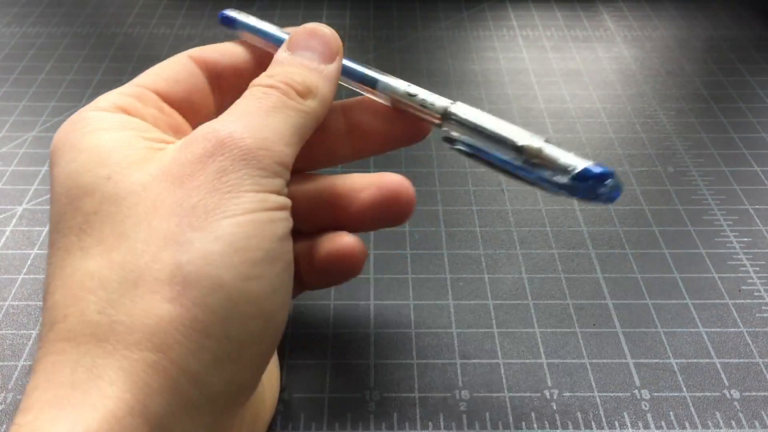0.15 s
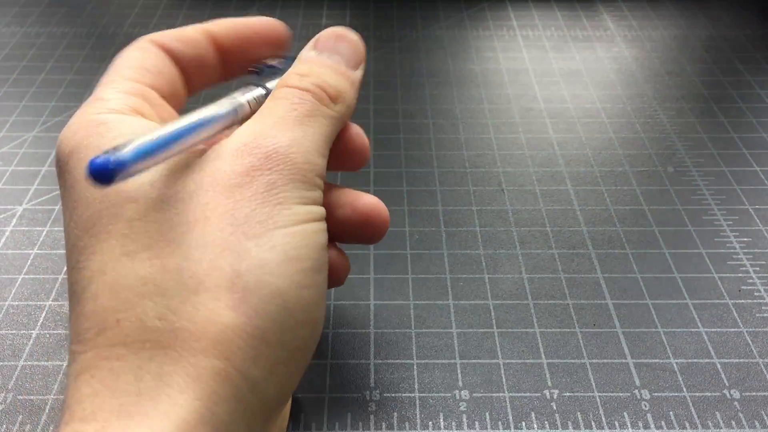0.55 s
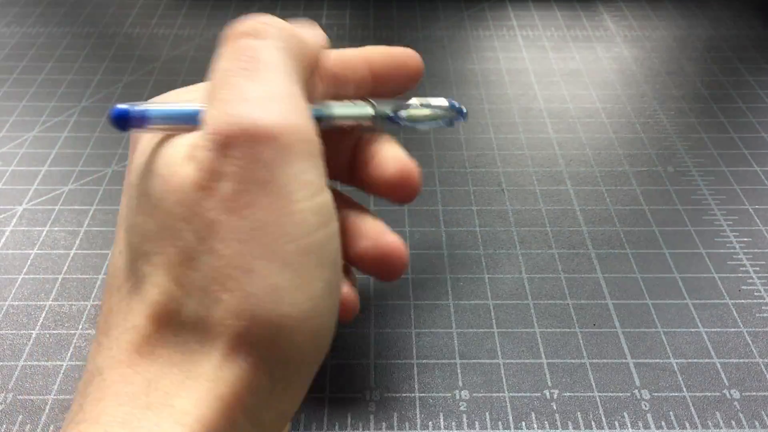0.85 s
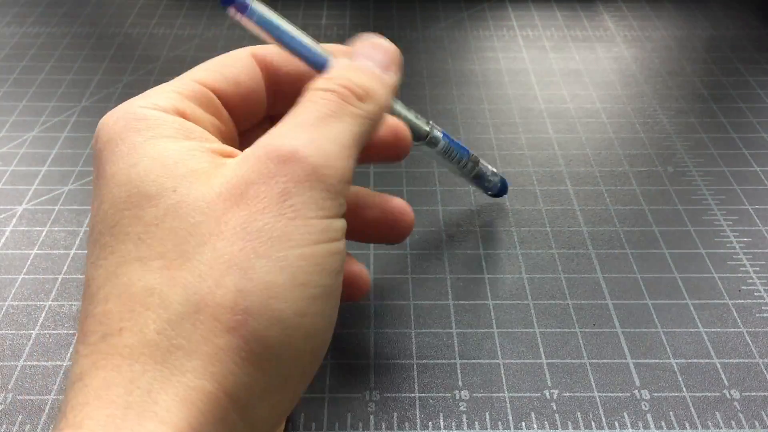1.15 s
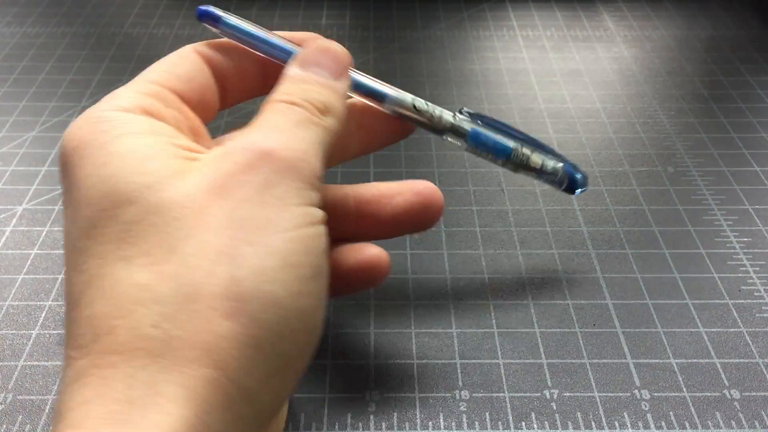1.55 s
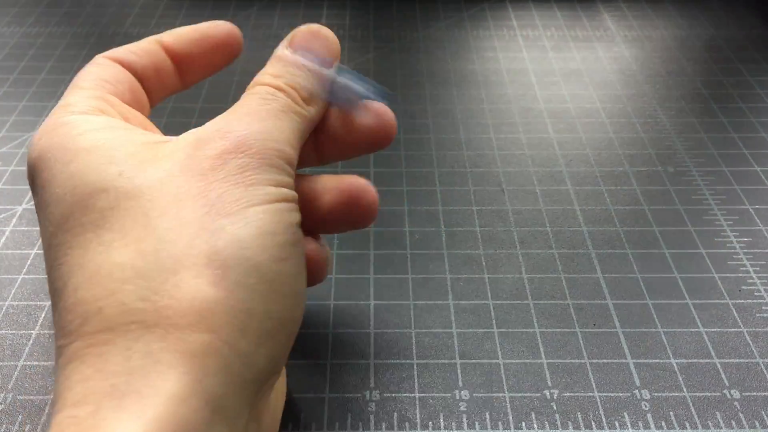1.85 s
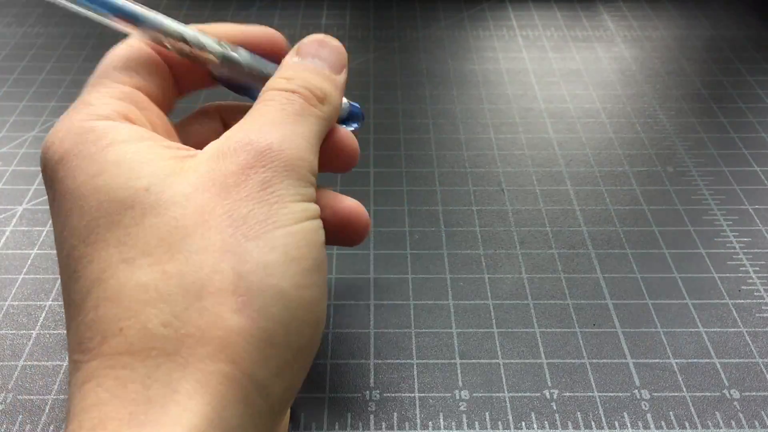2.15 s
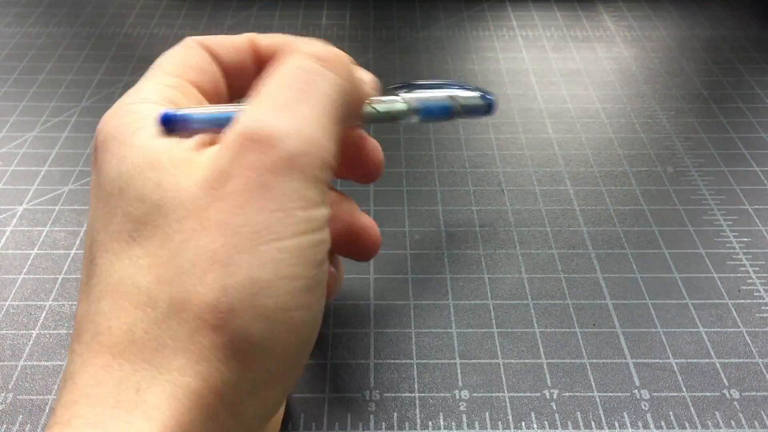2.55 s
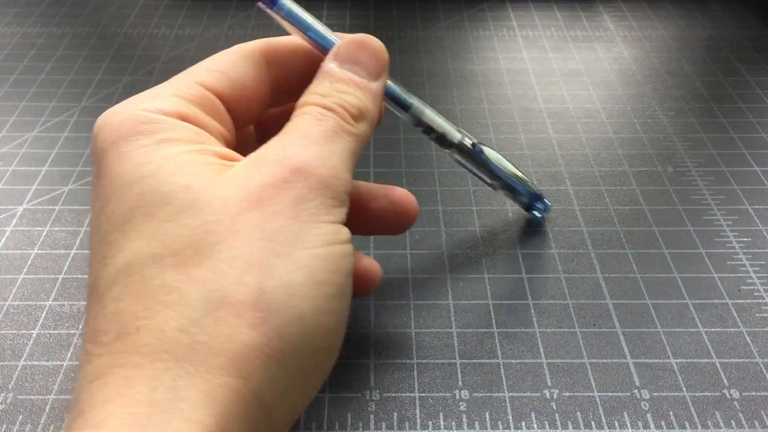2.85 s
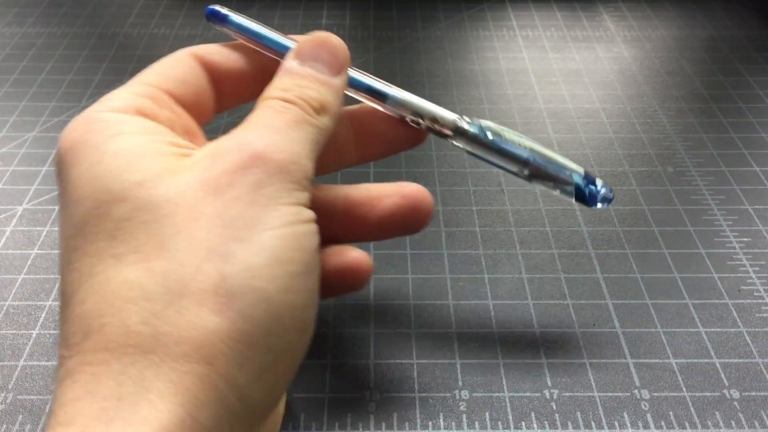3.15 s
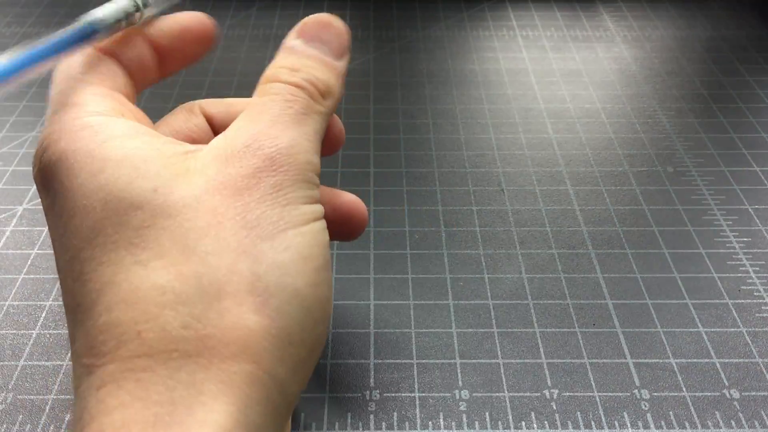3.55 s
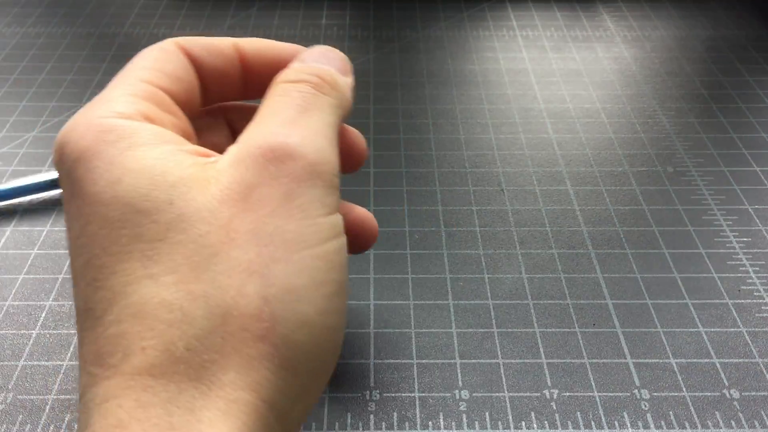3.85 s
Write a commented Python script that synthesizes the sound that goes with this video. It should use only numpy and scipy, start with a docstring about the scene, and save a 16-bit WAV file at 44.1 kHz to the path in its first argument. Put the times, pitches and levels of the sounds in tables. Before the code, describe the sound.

A plastic pen spun in one hand ticks, taps a mat twice, then clacks down loudly

```python
"""First comes a low room rumble with hum and faint hiss, shaped from noise around a sine; a drone swells in it.
Just above a cutting mat in a small quiet room, close to the microphone, one hand spins a plastic pen.
Skin hisses, the hand rustles and fingers thud: stick-slip grains in soft bands, and short sine pulses.
The cap ticks; twice the tip taps the mat and drags a little; at last the pen slips, clacks down and bounces.
Each contact is a sharp push with a chatter of loose parts, setting decaying modes ringing in the room."""
import sys
import numpy as np
from scipy import signal
from scipy.fft import rfft, irfft
from scipy.io import wavfile
from scipy.ndimage import uniform_filter1d

SR = 44100
rng = np.random.default_rng(int(sys.argv[2]) if len(sys.argv) > 2 else 0)


def int16_out(signal):
    """Quantize to a 16-bit WAV file."""
    q = np.round(np.clip(np.atleast_2d(signal).T, -1, 1) * 32767)
    wavfile.write(sys.argv[1], SR, q.astype(np.int16))


N = 176400  # 4 s
TOP_HZ = 16000  # upper limit of the recorder, also of skin hiss and contact shapes


def undb(db):
    """Decibels to gain."""
    return 10 ** (np.asarray(db) / 20)


def unit(x):
    """Scale to rms 1."""
    return x / np.sqrt(np.mean(x ** 2))


def conv(x, h):
    """Pass x through the response h, keeping the length of x."""
    return signal.fftconvolve(x, h)[:len(x)]


def colour(x, points, size=2048):
    """Minimum-phase filter through (f/Hz, level/dB) points, so nothing sounds before its cause."""
    hz, db = np.array(points, float).T
    f = np.maximum(np.fft.rfftfreq(size, 1 / SR), 1)
    gain_db = np.interp(np.log(f), np.log(np.sort(hz)), db)
    # Folding the cepstrum onto positive times makes the response causal
    cepstrum = irfft(np.log(undb(gain_db)))
    cepstrum[1:size // 2] *= 2
    cepstrum[size // 2 + 1:] = 0
    return conv(x, irfft(np.exp(rfft(cepstrum))))


def walk(rate):
    """Slow random drift of rms 1, from random steps at this rate (Hz) smoothed twice."""
    k = int(SR / rate)
    steps = np.repeat(rng.standard_normal(N // k + 1), k)
    smooth = uniform_filter1d(uniform_filter1d(steps, k), k)
    return unit(smooth[:N])


def swell(t, middle, half):
    """Bell-shaped rise and fall; half is its standard deviation in seconds."""
    return np.exp(-.5 * ((t - middle) / half) ** 2)


def grains(per_s, spread_db):
    """Dense stick-slip clicks of uneven size, at rms 1."""
    happens = rng.random(N) < per_s / SR
    size = rng.standard_normal(N) * undb(spread_db * rng.standard_normal(N))
    return unit(happens * size)


# Spectrum of the room air at the microphone: f/Hz, relative density/dB per Hz
AIR_SPECTRUM = [(15, -42), (25, -27.5), (35, -18.5), (50, -1), (70, 0), (100, -7), (125, -2.5), (150, -9),
                (187, -5.5), (240, -15.5), (330, -18), (500, -26), (870, -25.5), (1260, -31), (2080, -34),
                (4940, -41.5), (6300, -41.5), (7900, -45.5), (9000, -42), (10500, -48.5), (12000, -44.5),
                (16000, -51.5)]


def air(t):
    """Room rumble and hiss, coloured noise drifting slowly in level, with a steady mains hum."""
    level_db = -58 + 0.82 * walk(2.91)  # drift in dB rms
    noise = unit(colour(rng.standard_normal(N), AIR_SPECTRUM, size=16384))
    hum = unit(np.sin(2 * np.pi * 61 * t))
    return noise * undb(level_db) + undb(-69.5) * hum


# Level of the low drone in the room: t/s, level/dB
DRONE_LEVEL = [(0, -73), (.6, -66.5), (.9, -61.5), (1.4, -63), (2.2, -67), (4, -75.5)]


def drone(t):
    """A narrow low resonance of the room, noise in a thin band, that swells and wavers."""
    centre_hz, width_hz, waver_db = 188, 23, 2
    edges = [centre_hz - width_hz / 2, centre_hz + width_hz / 2]
    band = signal.butter(2, edges, "band", fs=SR, output="sos")
    tone = signal.sosfilt(band, rng.standard_normal(N))
    wavering = unit(tone * undb(waver_db * walk(8.2)))
    return wavering * undb(np.interp(t, *np.array(DRONE_LEVEL).T))


# Colour of the room's tail: f/Hz, level/dB
ROOM_COLOUR = [(100, 1), (300, 7.5), (450, 4.5), (700, 5), (1200, -0.5), (1900, -3.5), (2500, -2.5),
               (3500, -4.5), (5000, -2.5), (9000, -2), (15000, -2)]


def room(x, wet_db):
    """One reflection from things close by on the desk, then a diffuse tail whose treble dies first."""
    t60_s, treble_t60_s, build_s = 0.3, 0.25, 0.0031
    echo_s, echo_db = .0034, -17.5
    t = np.arange(SR // 2) / SR
    noise = rng.standard_normal(len(t))
    low = signal.sosfilt(signal.butter(1, 4000, fs=SR, output="sos"), noise)
    treble = noise - low
    tail = low * undb(-60 * t / t60_s) + treble * undb(-60 * t / treble_t60_s)
    tail = tail * (1 - np.exp(-t / build_s))
    h = undb(wet_db) * colour(tail / np.linalg.norm(tail), ROOM_COLOUR)
    h[int(echo_s * SR)] += undb(echo_db)
    return x + conv(x, h)


# Skin brushing the barrel, close: middle t/s, half length/s, level/dB, centre f/Hz, width/octaves
RUBS = [(.355, .016, -75.5, 5040, .2), (.355, 0.02, -79, 12000, .5), (.472, .012, -75, 14000, 0.17),
        (1.03, 0.01, -76, 13000, 0.4), (1.02, .05, -82, 12000, 0.61), (1.927, 0.03, -83, 12000, .5),
        (2.025, 0.01, -80, 14000, .25), (2.36, 0.084, -82.5, 12000, 0.82), (2.62, .02, -75.5, 12500, 0.59),
        (3.51, .009, -74, 14000, .2), (3.558, 0.012, -74.5, 13000, 0.61)]
# The hand shifting close to the microphone: same columns as the rubs
RUSTLES = [(1.82, 0.047, -62.5, 248, 0.3), (2.024, 0.062, -74, 300, 0.52), (2.325, 0.046, -64, 242, 0.46)]
# Soft finger thuds: t/s, level/dB, f/Hz
THUDS = [(.25, -49, 58.7), (0.501, -51.5, 75.4), (0.859, -53, 63), (1.059, -49.5, 98), (2.0, -64, 560),
         (2.252, -57, 152), (2.304, -43.5, 84), (2.883, -51, 138), (3.012, -49, 207), (3.34, -50, 141)]


def fingers(t):
    """Thin hiss of skin on plastic, rustle of the hand, and dull thuds as the fingers swing and catch."""
    thud_s = 0.0066  # half length
    f = np.maximum(np.fft.rfftfreq(N, 1 / SR), 1)
    friction, out = rfft(grains(5000, 1.5)), np.zeros(N)
    for at, half, db, hz, octaves in RUBS + RUSTLES:
        band = np.exp(-.5 * (np.log2(f / hz) / octaves) ** 2) * (f < TOP_HZ)
        hiss = unit(irfft(friction * band, N))
        out += undb(db) * hiss * swell(t, at, half)
    for at, db, hz in THUDS:
        wave = np.sin(2 * np.pi * (hz * (t - at) + rng.random()))
        out += undb(db) * swell(t, at, thud_s) * wave
    return out


def ring(x, modes):
    """The bare force plus the decaying modes that it sets ringing."""
    t = np.arange(SR // 2) / SR
    h = np.zeros(len(t))
    for hz, t60, db in modes:
        rate = np.log(1000) / t60  # 60 dB of decay in t60
        h += undb(db) * rate / SR * np.exp(-rate * t) * np.cos(2 * np.pi * hz * t)
    return x + conv(x, h)


def blows(rows, rattle_s, size=4096):
    """Each contact is one sharp push, followed by a few milliseconds of chatter from the loose parts."""
    out, t = np.zeros(N + size), np.arange(size) / SR
    # The loose parts are too light to rattle below 1350 Hz
    light = signal.butter(2, 1350, "high", fs=SR, output="sos")
    for at, db, hz, thud_db, top_db, rattle_db in rows:
        chatter = signal.sosfilt(light, rng.standard_normal(size) * np.exp(-t / rattle_s))
        push = undb(rattle_db) * chatter / np.linalg.norm(chatter)
        push[0] += 1
        shape = [(50, thud_db - 0.5), (220, thud_db), (hz / 2.8, thud_db),
                 (hz / 1.32, 0), (hz * 1.16, 0), (TOP_HZ, top_db)]
        start = int(at * SR)
        out[start:start + size] += undb(db) * colour(push, shape)
    return out[:N]


# Ticks in the hand, before ringing and room:
# t/s, level/dB, strongest f/Hz, thud/dB, top treble/dB, rattle of loose parts/dB
TICKS = [(.5175, -25, 3840, -5.5, 1.5, -5.5), (.6523, -21.5, 5440, -7, -6, -1),
         (2.2035, -47, 8000, -5, -6, -4), (2.2715, -45.5, 9000, -7, -15, 0.5),
         (3.5518, -47.5, 9000, 1.5, 0, -3)]
# Ringing of the cap: f/Hz, t60/s, strength/dB
CAP_MODES = [(1850, 0.0087, 12), (3400, 0.0086, 8.5), (3500, 0.052, 11), (5200, 0.098, 8), (5450, 0.029, 9),
             (6200, 0.057, -5), (9500, 0.039, 4), (13500, .01, 4)]


def ticks():
    """Small sharp contacts in the hand make the cap ring."""
    return room(ring(blows(TICKS, rattle_s=0.0036), CAP_MODES), wet_db=-10)


# The tip dragging on the mat, before ringing and room: middle t/s, half length/s, level/dB
DRAGS = [(1.533, 0.01, -62), (1.559, 0.0085, -54), (1.583, .015, -69.5), (3.03, 0.041, -72),
         (3.117, 0.0069, -65)]
# Colour of the drag: f/Hz, level/dB
DRAG_COLOUR = [(300, -6), (800, -16), (1200, -4), (1800, -1), (2500, -5), (3500, -4), (7000, -17.5),
               (15000, -21)]


def drag(t):
    """The tip catches and slips on the mat, in dense clicks that follow its pressure."""
    pressure = sum(undb(db) * swell(t, at, half) for at, half, db in DRAGS)
    slips = grains(8000, 2)
    return unit(colour(slips, DRAG_COLOUR)) * pressure


# Tip contacts on the mat, two of them loud: same columns as the ticks
TAPS = [(1.4733, -7, 2380, -15, -9, -4), (1.5737, -33, 3000, -15, 3, -5),
        (2.9268, -25.5, 2590, -10, -25, -2.5), (2.9981, -9, 2770, -12, -19, 0.5),
        (3.1158, -53, 1900, -10, -21, -11)]
# Ringing of the tip on the mat: f/Hz, t60/s, strength/dB
TIP_MODES = [(970, 0.045, 16.5), (1160, .04, 18), (1390, 0.02, 9), (1730, 0.038, 16), (2050, 0.028, 6),
             (2360, 0.17, 4), (2530, 0.035, 12.5), (2740, 0.12, -26), (2920, 0.055, -21), (4330, 0.05, -12),
             (5800, 0.042, -14), (9600, .015, -16)]


def taps(t):
    """Taps and drags on the mat excite the same ringing of the tip."""
    force = blows(TAPS, rattle_s=0.0025) + drag(t)
    return room(ring(force, TIP_MODES), wet_db=-8)


# The pen clacking down end over end and bouncing: same columns as the ticks
DROP = [(3.8478, 13, 2360, -8.5, -21.5, -7.5), (3.8589, 3, 4660, -5.5, 0.5, 8),
        (3.8702, 6, 2370, -7.5, -20, -4), (3.959, -2, 4360, -17, -14, 0), (3.9655, 0.5, 3250, 2.5, -14, -1),
        (3.9702, 6.5, 1060, -32, -39, -13), (3.972, 11.5, 1006, -21.5, -71, 3.5),
        (3.9787, -10, 3970, -9, -19, -21)]
# Ringing of the whole barrel: f/Hz, t60/s, strength/dB
BARREL_MODES = [(288, 0.13, 4), (320, 0.063, 4.5), (560, 0.02, -5), (830, .04, 1), (1020, 0.062, 2),
                (1310, 0.04, 5.5), (2500, 0.0086, 7), (3730, 0.004, 6), (4670, .02, -13), (6430, .04, -7),
                (6930, 0.02, 11), (8400, 0.014, 10.5), (8700, 0.018, 15), (13900, 0.018, 2)]


def fall():
    """A quick run of hard blows makes the whole barrel ring."""
    return room(ring(blows(DROP, rattle_s=0.0019), BARREL_MODES), wet_db=-7.5)


def bend(x, order=3):
    """Bending waves lag in the barrel around 3560 Hz: all-pass stages smear each push into a brief chirp."""
    lag_hz, width_hz = 3560, 7900
    _, a = signal.iirpeak(lag_hz, lag_hz / width_hz, fs=SR)
    for _ in range(order):
        x = signal.lfilter(a[::-1], a, x)
    return x


# Hard things on the desk, ringing along with the taps and the fall: f/Hz, t60/s, strength/dB
DESK_MODES = [(1295, .16, 11), (1594, 0.079, 7.5), (2290, 0.43, -3), (2220, 0.073, 13), (2417, 0.29, -16),
              (2630, 0.17, -15), (2800, 0.15, 14), (3180, 0.22, 13), (2950, 0.25, -41)]
# Overall colour of the pen at the microphone: f/Hz, level/dB
PEN_COLOUR = [(25, -19), (100, -1), (300, 3), (420, 0), (800, -1.5), (3000, -1), (7000, -1), (7700, -8),
              (8700, -4), (10300, -2.5), (13000, -3.5), (15400, 1), (16000, -3)]


def scene():
    """Room air and drone, the hand, then ticks, taps on the mat and the fall, in one room."""
    t = np.arange(N) / SR
    background = air(t) + drone(t)
    on_desk = ring(taps(t) + fall(), DESK_MODES)
    pen = colour(bend(ticks() + on_desk), PEN_COLOUR)
    return (background + fingers(t) + pen)[None]


def record(dry):
    """The recorder rounds the loudest peaks and cuts the top."""
    ceiling = .75  # of full scale
    limited = ceiling * np.tanh(dry / ceiling)
    return signal.sosfilt(signal.ellip(10, .2, 70, TOP_HZ, fs=SR, output="sos"), limited)


dry = scene()
out = record(dry)
int16_out(out)
```